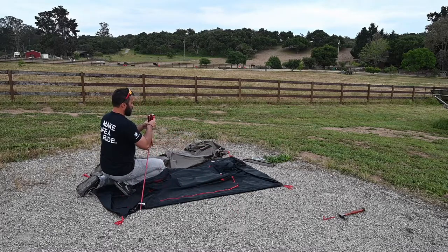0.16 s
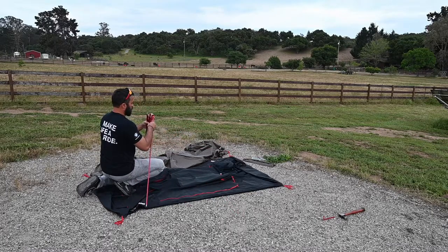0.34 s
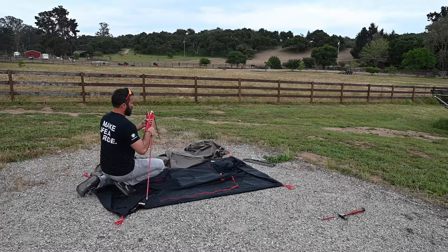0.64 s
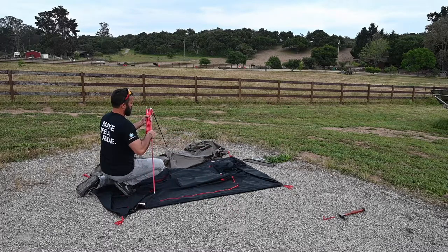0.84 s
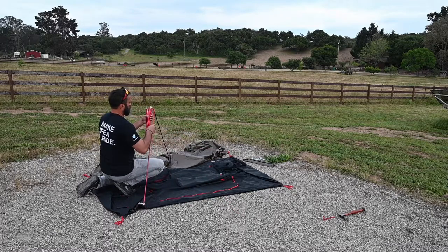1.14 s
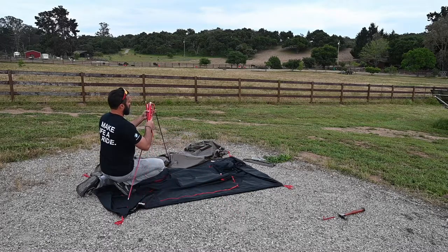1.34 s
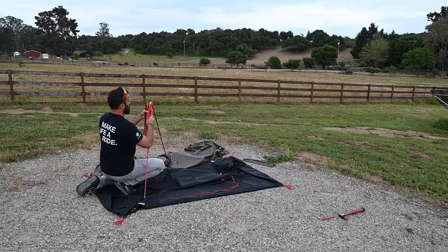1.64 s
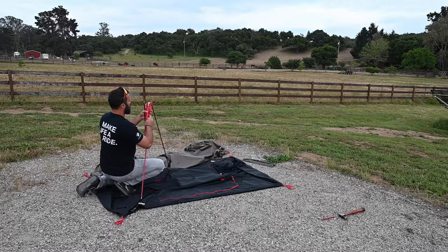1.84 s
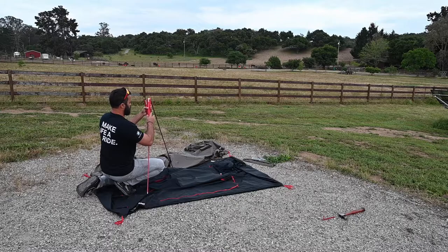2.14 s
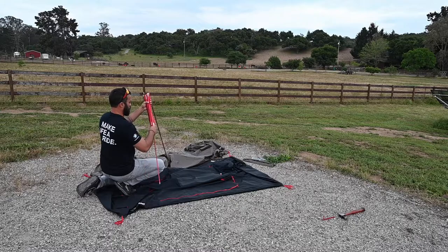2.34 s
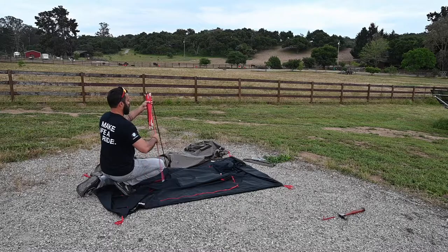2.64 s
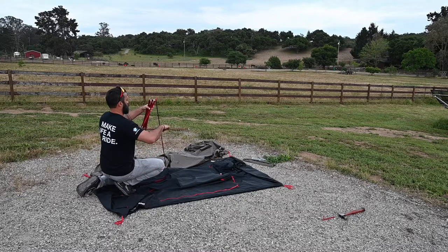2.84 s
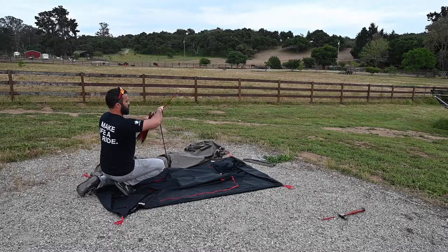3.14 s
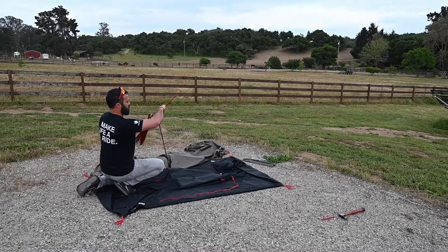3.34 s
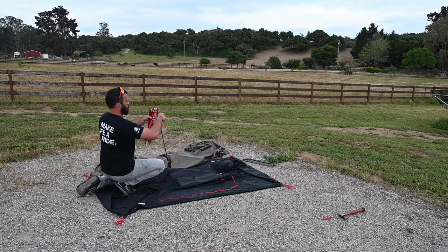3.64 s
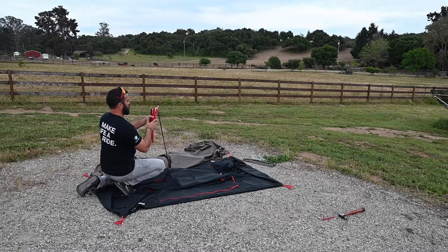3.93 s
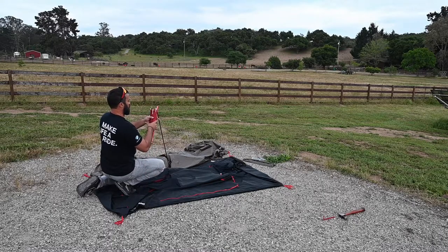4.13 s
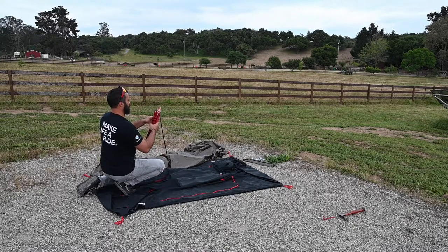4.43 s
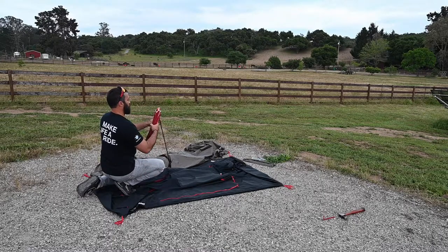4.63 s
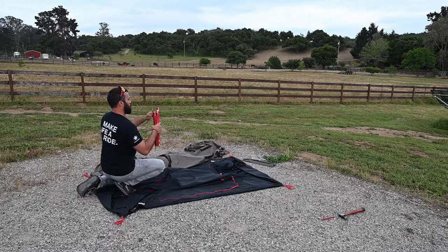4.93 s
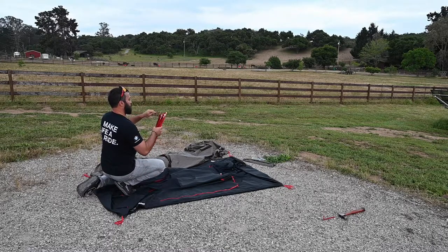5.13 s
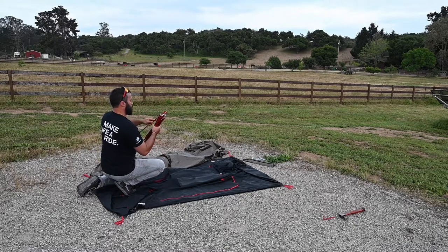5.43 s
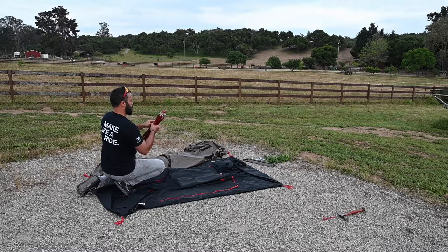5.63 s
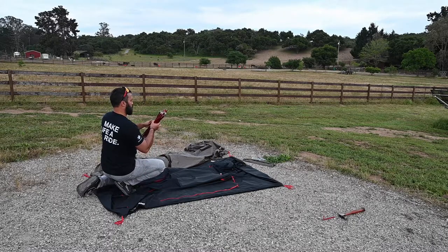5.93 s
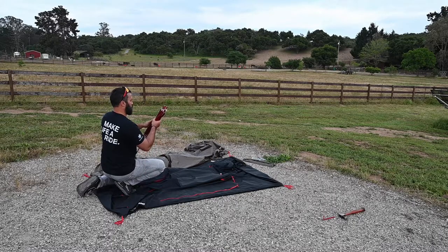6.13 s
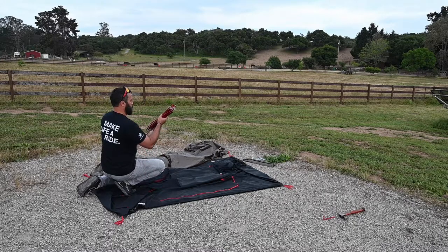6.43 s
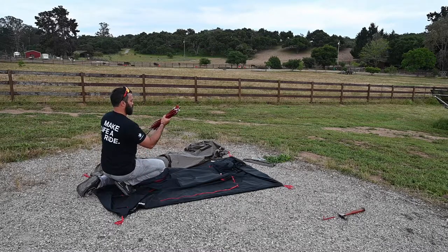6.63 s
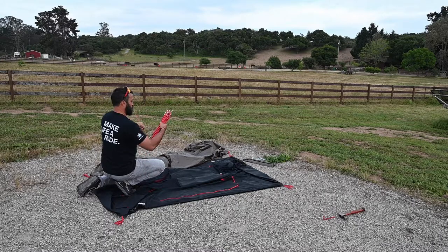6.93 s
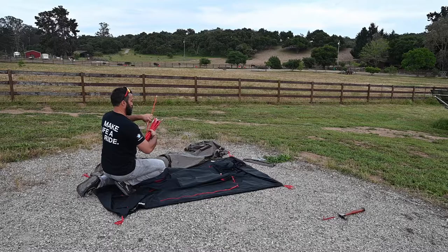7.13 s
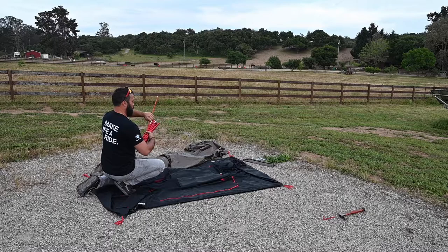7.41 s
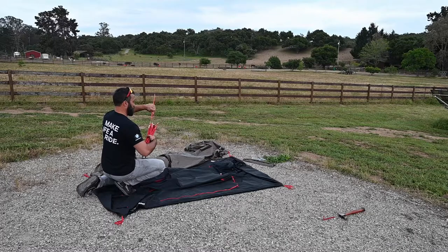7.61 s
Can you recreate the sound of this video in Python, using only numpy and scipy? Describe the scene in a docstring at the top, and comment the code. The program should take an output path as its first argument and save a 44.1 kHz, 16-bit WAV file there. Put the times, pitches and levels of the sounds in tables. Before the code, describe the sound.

Outdoors, hollow metal tent poles are folded into a bundle: irregular dry ticks, light scrapes and a few hard bright clacks over quiet air.

```python
"""An aluminium tent pole on shock cord is folded: sections slide out of their joints and clack on the held bundle.
Each contact is a few sharp ticks, a short noisy rattle damped by the grip, and a thin ring of tube modes.
Hands, sleeves and tubes rub in between, as gated noise with catches and crackles.
Around it lie a low steady hush of noise, a far bird of gliding sine notes and a faint sine drone.
Scattered tails and a smeared fence echo place it outdoors; loud peaks briefly pull the level down."""
import sys
import numpy as np
from scipy import signal
from scipy.fft import rfft, irfft, next_fast_len
from scipy.io import wavfile
from scipy.ndimage import uniform_filter1d, map_coordinates

SR = 44100
rng = np.random.default_rng(int(sys.argv[2]) if len(sys.argv) > 2 else 0)


def unload_wav(signal):
    """Save mono or channel-first audio to the path in sys.argv[1] as 16-bit WAV at rate SR, clipped to [-1, 1]."""
    wavfile.write(
        sys.argv[1],
        SR,
        np.round(np.clip(np.atleast_2d(signal).T, -1, 1) * 32767).astype(np.int16),
    )


N = 342657

# colour of tubes scraping along each other: (frequency [Hz], relative density [dB per Hz])
SCRAPE_COLOUR = [(500, -32.5), (1500, -12.5), (2800, 0), (4400, 0), (5800, -8.5), (8000, -3),
                 (10200, -14.5), (12000, -9.5), (16000, -24)]
# colour of distant wind and traffic: (frequency [Hz], relative density [dB per Hz])
HUSH_COLOUR = [(15, -33), (25, -17), (99, -0.5), (354, -2.5), (531, -1), (1190, -6), (1440, -10.5),
               (2410, -17), (2760, -15.5), (3250, -17), (4370, -15.5), (5430, -19), (7920, -19.5),
               (14800, -22.5), (16000, -24.5)]
FIRM_DB = -42.5  # contact level taken as a firm blow; sheen and settling are reckoned from it


def amp(db):
    """Decibels to an amplitude factor."""
    return 10 ** (np.asarray(db) / 20)


def unit(x):
    """Scale to rms 1."""
    return x / np.sqrt(np.mean(x ** 2) + 1e-20)


def along(points, hz):
    """Interpolate (Hz, value) points on a log frequency axis."""
    f, v = np.transpose(points)
    return np.interp(np.log(hz + 1), np.log(f + 1), v)


def add(track, s, sound):
    """Mix a sound into a track from time s."""
    part = track[max(round(s * SR), 0):][:len(sound)]
    part += sound[:len(part)]


def wobble(rate):
    """A smooth random curve, rate knots a second."""
    knots = rng.standard_normal(int(N * rate / SR) + 4)
    return map_coordinates(knots, [np.arange(N) * rate / SR])


def filtered(x, response):
    """Multiply the spectrum of x by a response of frequency."""
    m = next_fast_len(N + SR // 2)
    return irfft(rfft(x, m) * response(np.fft.rfftfreq(m, 1 / SR)), m)[..., :N]


def noise(spectrum):
    """Coloured noise of rms 1."""
    return unit(filtered(rng.standard_normal(N), lambda hz: amp(along(spectrum, hz))))


def causal(gain_db):
    """The minimum-phase response with these gains: nothing sounds before the blow."""
    cepstrum = irfft(np.log(amp(gain_db)))
    half = len(cepstrum) // 2
    cepstrum[1:half] *= 2
    cepstrum[half + 1:] = 0
    return np.exp(rfft(cepstrum))


def hush(swell_db):
    """Distant wind and traffic: coloured noise, nearly steady."""
    return amp(swell_db * wobble(3)) * noise(HUSH_COLOUR)


def hush_width():
    """A separate noise for the side of the hush, weak in the bass and wider towards the treble."""
    # side weighting of the hush: (frequency [Hz], gain [dB])
    width = [(30, -20), (60, -23.5), (250, -17.5), (1000, -11.5), (4000, -2), (12000, 1.5)]
    return filtered(noise(HUSH_COLOUR), lambda hz: amp(along(width, hz)))


def drone(pitch_hz):
    """A low, slightly unsteady hum from far away: a sine of wandering pitch and level."""
    # level of the hum before its small wobble: (time [s], level [dB])
    hum = [(5.6, -99), (6.0, -73), (6.85, -77), (7.15, -94)]
    level_db = np.interp(np.arange(N) / SR, *np.transpose(hum))
    pitch = pitch_hz + 1.55 * wobble(5)
    tone = unit(np.sin(2 * np.pi * np.cumsum(pitch) / SR))
    return amp(level_db + 1.5 * wobble(6)) * tone


def bird(fall_hz, faint_hz, faint_db):
    """Falling sine whistles in quick runs of two or three, with mostly weaker, lower ones throughout."""
    note_s, step_s = .028, .04  # length of a note, time from note to note
    first_s, gap_s, jitter_s = .19, 0.35, 0.017  # first run, time from run to run, its unevenness
    trill_hz, spread_hz = 4660, 75  # starting pitch of a note
    trill_db, fade_db_per_s = -67.5, .6  # level at time zero, and its steady loss
    weak_notes, weak_spread_db, weak_drop_hz = 190, 6, 450  # count, range of level above and pitch below
    out, u = np.zeros(N), np.linspace(0, 1, int(note_s * SR))

    def whistle(start_hz):
        """One note gliding down ever faster."""
        pitch = start_hz - fall_hz * u * (1 + u) / 2
        return unit(np.sin(np.pi * u) * np.sin(2 * np.pi * np.cumsum(pitch) / SR))

    for beat in np.arange(first_s, N / SR, gap_s):
        s = beat + rng.normal(0, jitter_s)
        db = trill_db - fade_db_per_s * beat
        for k in range(2 + rng.integers(2)):
            note = whistle(rng.normal(trill_hz, spread_hz))
            add(out, s + k * step_s, amp(db + rng.normal(0, 2)) * note)
    for k, (late, drop, strength) in enumerate(rng.random((weak_notes, 3))):
        s = (k + late) / weak_notes * N / SR
        note = whistle(faint_hz - weak_drop_hz * drop)
        add(out, s, amp(faint_db + weak_spread_db * strength) * note)
    return out


def fidget(db, spread_db):
    """The held bundle never lies quite still: very faint scrape noise comes and goes in flurries."""
    return amp(db) * unit(amp(spread_db * wobble(130) + 7.1 * wobble(13))) * noise(SCRAPE_COLOUR)


def rubbing(grit_db, edge_s, crackle_db):
    """Tubes scrape in tiny catches and crackles while hands and sleeves brush as darker noise."""
    # strokes: (start [s], end [s], scrape level [dB], cloth level [dB])
    rubs = [(0.079, .13, -54.5, -66.5), (0.695, .745, -54, -80), (0.926, 1.094, -58, -59.5),
            (1.134, 1.2, -61, -52.5), (1.58, 1.654, -57, -63), (1.717, 1.787, -58.5, -57),
            (1.834, 1.908, -56, -60), (1.926, 2.02, -61, -68), (3.022, 3.077, -62.5, -61.5),
            (3.17, 3.32, -64, -65), (3.358, 3.418, -58, -72), (3.936, 4.126, -62, -75),
            (4.126, 4.232, -48.5, -68.5), (4.68, 4.803, -61, -60.5), (4.951, 5.02, -60, -73),
            (5.877, 5.967, -58.5, -62.5), (6.423, 6.477, -53, -59), (7.487, 7.588, -55.5, -65)]
    # colour of hands and sleeves: (frequency [Hz], relative density [dB per Hz])
    cloth_colour = [(200, -18), (600, 0), (1100, 2.5), (1900, -2), (3500, -29.5), (8000, -20.5)]
    t = np.arange(N) / SR
    scrape, cloth = np.zeros((2, N))
    for start, end, scrape_db, cloth_db in rubs:
        # the ramps reach slightly outside the stroke
        stroke = np.clip(np.minimum(t - start, end - t) / edge_s + 0.27, 0, 1)
        scrape += amp(scrape_db) * stroke
        cloth += amp(cloth_db) * stroke
    catches = unit(amp(grit_db * wobble(350)))
    slips = (rng.random(N) < 90 / SR) * rng.uniform(0.46, 1, N)  # about 90 a second
    crackle = unit(signal.fftconvolve(slips, amp(-60 * t[:SR // 20] / 0.015))[:N])
    grain = unit(catches + amp(crackle_db) * crackle)
    brush = unit(amp(7.3 * wobble(70)) + crackle)
    return scrape * grain * noise(SCRAPE_COLOUR) + cloth * brush * noise(cloth_colour)


def contacts():
    """Every touch of the tubes as (s, dB, chatter s, knock dB, body dB): settling clacks, judders, stray ticks."""
    # clacks and knocks of tube on tube:
    # (time [s], relative level [dB], nominal chatter [s], low knock gain [dB], body gain [dB])
    clacks = [(0.1366, -36.5, 0.00057, 4, -1), (0.7066, -46, 0.0039, 4, 14), (1.068, -50.5, 0.0078, 34, 0),
              (1.0922, -48.5, .0028, 20.5, 13), (1.1012, -44.5, 0.00067, 3, -1),
              (1.138, -58, 0.0053, 39, 2), (1.3507, -45.5, 0.00048, -1, -4.5),
              (1.4885, -53.5, 0.0056, 4, 6.5), (1.5795, -35.5, 0.00055, -3, -13),
              (1.5845, -41, .0029, 19.5, 17.5), (1.6793, -52, 0.0018, 8, 4.5), (1.726, -55, 0.0072, 40, 2),
              (1.935, -53, 0.0015, 13, 5), (1.9936, -51, .0016, 3, 6.5), (2.012, -55.5, 0.0017, 20, 13),
              (2.1218, -41.5, 0.00055, 1, 3), (2.134, -46, 0.00051, -2, -8), (2.418, -55, .0012, 8, 3.5),
              (2.5356, -48, 0.002, -18, -4), (2.7999, -33.5, .0012, 3, 0), (2.8843, -45, 0.0058, 0, 2),
              (3.102, -53, 0.0016, 6, 3), (3.25, -44, .002, 11.5, 9), (3.2803, -27, 0.0023, -2, -2),
              (3.414, -54, 0.0026, -7, -11), (3.5565, -17.5, 0.0029, 2.5, -1), (3.589, -39.5, 0.0033, 0, 3),
              (3.63, -44.5, .005, 9, 2), (3.855, -49, 0.0023, 5, 4), (3.876, -53, .0017, 3, 1),
              (3.97, -51, 0.0022, 9, 5), (3.9835, -40.5, 0.002, 7, 2), (4.004, -32.5, 0.0026, 2, -0.5),
              (4.064, -51, .0025, -8, 3), (4.2735, -34, 0.0017, 6, 0), (4.3674, -46.5, 0.0015, 7, 7.5),
              (4.4053, -52.5, .0012, 10, 15), (4.54, -59, .0016, 9, 6), (4.7685, -55.5, 0.0068, 39, 22),
              (4.845, -50.5, .0043, 20.5, -3), (5.2445, -37, 0.0052, 2, 4), (5.262, -47.5, 0.0042, 7, 2),
              (5.427, -54, 0.0023, 18, 13), (5.4916, -51, .0008, 1, 7), (5.5198, -36, .0005, -7, -3.5),
              (5.5268, -39, 0.00088, 2, 0), (5.565, -46.5, .0023, 4, 4), (5.777, -46.5, .0021, -13, 6),
              (5.794, -47.5, 0.00057, 5, 3), (5.889, -46, 0.00044, -16, 2), (5.8967, -43.5, .0014, 11, 1),
              (5.903, -34.5, 0.00037, -13, 2), (5.9336, -42, 0.0016, -18, 11),
              (6.0775, -44, 0.00061, -7, 2), (6.315, -58, .0012, -8, 2.5), (6.466, -49.5, .0022, -12, 11),
              (6.537, -55.5, 0.0038, 1, 9), (6.694, -53.5, 0.00048, -12, 8), (6.836, -36.5, 0.0028, -5, 4),
              (6.8409, -30.5, .0019, 4, 2), (6.872, -43.5, 0.0051, 5, 5.5),
              (7.1856, -48.5, 0.0034, -0.5, 1), (7.2129, -36.5, .001, -1, 1), (7.5635, -36, 0.0015, -2, -4),
              (7.6721, -16, 0.00037, 2.5, 1), (7.687, -22.5, .003, 1, -1.5)]
    # a section judders along its neighbours:
    # (start [s], end [s], relative level at start [dB], at end [dB], low knock gain [dB], body gain [dB])
    judders = [(4.139, 4.209, -37.5, -41.5, 2, 2), (6.4263, 6.453, -36, -40.5, -24, 0),
               (7.525, 7.545, -34, -39, -1.5, 3)]
    # after a blow the tube settles: mean gap, first touch below a firm blow, loss a touch
    settle_s, settle_db, settle_loss_db = .0095, -12.5, 10
    # the grip holds the rebounds of hard blows in check: dB of settling per dB of blow
    settle_grows, settle_chatter_s = 0.65, 0.0028
    catch_s, catch_chatter_s, catch_spread_db = 0.011, .0038, 1  # approximate gap, chatter, unevenness
    ticks_per_s, tick_db, tick_spread_db = 4, -63, 3  # loose sections touch lightly in the hand
    tick_chatter_s, tick_knock_db, tick_body_db = .002, 8.5, 7.5
    touches = []
    chances = rng.uniform(-1, 1, (len(clacks), 2, 2))
    for (s, db, length, *colour), chance in zip(clacks, chances):
        touches.append((s, db, length, *colour))
        first_db = FIRM_DB + settle_grows * (db - FIRM_DB) + settle_db
        for k, (late, force) in enumerate(chance):
            when = s + settle_s * (k + 1 + late / 3)
            level_db = first_db - settle_loss_db * k + 2 * force
            touches.append((when, level_db, settle_chatter_s, *colour))
    for start, end, first_db, last_db, *colour in judders:
        for u in np.linspace(0, 1, round((end - start) / catch_s) + 1):
            s = start + u * (end - start) + rng.normal(0, catch_s / 10)
            db = first_db + u * (last_db - first_db) + rng.normal(0, catch_spread_db)
            touches.append((s, db, catch_chatter_s, *colour))
    for slot in np.arange(0, N / SR, 1 / ticks_per_s):
        s = slot + rng.random() / ticks_per_s
        db = rng.normal(tick_db, tick_spread_db)
        touches.append((s, db, tick_chatter_s, tick_knock_db, tick_body_db))
    return touches


def chatter(t, length, count):
    """Force of one contact: a first graze, then rebounds scattered over roughly its length."""
    force = np.zeros(len(t))
    when = (np.arange(count) + rng.uniform(-.5, .5, count)) / count * 1.35 * abs(length)
    when[0] = 0
    strength = amp(rng.normal(0, 1, count)) * rng.choice([-1, 1], count)
    strength[0] *= .5
    np.add.at(force, np.round(when * SR).astype(int), strength)
    return force


def tube_ring(t, detune, scatter_db):
    """Decaying bending modes; pitches and strengths vary with the section and where it is struck."""
    # bending modes of the tubes: (nominal frequency [Hz], relative level [dB], t60 [s])
    tube = [(860, 10, 0.024), (1460, -36, 0.044), (2030, -27, 0.043), (2600, -25.5, .06), (3240, 9, 0.13),
            (4210, -2, 0.16), (4360, 16, .06), (5080, 15, 0.084), (7200, -1.5, 0.17), (7800, -8, .08),
            (8300, -19, 0.11), (9100, -1.5, 0.088), (10900, -14, 0.1), (12200, -20, 0.11),
            (14300, -22, 0.11)]
    hz, db, t60 = np.transpose(tube)[:, :, None]
    pitch, strength, phase = rng.standard_normal((3, len(tube), 1))
    decay = amp(db + scatter_db * strength - 60 * t / t60)
    modes = decay * np.sin(2 * np.pi * (hz * (1 + detune * pitch) * t + phase))
    return unit(modes.sum(0))


def poles(clack_t60, bundle_db, ring_db, ripple_db, size=8192):
    """Every contact is a few sharp ticks, the dense short rattle of the gripped bundle, and a thin metal ring."""
    # colour of ticks and rattle: (frequency [Hz], gain [dB])
    clack_colour = [(40, -28.5), (350, -30), (800, -17.5), (1900, -8.5), (3000, -4.5), (4400, 0.5),
                    (5800, -3.5), (7200, 3), (8600, 2.5), (10200, -10), (11600, -8), (13500, -14),
                    (16000, -25)]
    sheen_base_db, sheen_per_db = 2, 0.2543  # treble of a firm blow; harder ones are brighter
    out, t, hz = np.zeros(N), np.arange(size) / SR, np.fft.rfftfreq(size, 1 / SR)
    colour = causal(along(clack_colour, hz))
    for s, db, length, knock_db, body_db in contacts():
        force = chatter(t, length, count=5)
        # each rebound feeds energy into the bundle, and the hand soaks it up
        energy = np.abs(signal.fftconvolve(force ** 2, amp(-60 * t / clack_t60) ** 2)[:size])
        bundle = unit(rng.standard_normal(size) * np.sqrt(energy))
        clack = unit(irfft(rfft(unit(force) + amp(bundle_db) * bundle) * colour))
        ring = unit(signal.fftconvolve(force, tube_ring(t, detune=0.0097, scatter_db=2.0))[:size])
        # the place and hardness of the blow tilt its colour
        sheen_db = sheen_base_db + sheen_per_db * (db - FIRM_DB)
        tilt_points = [(1600, knock_db), (2800, body_db), (4800, body_db),
                       (6600, 0), (9000, 0.0054), (11500, sheen_db)]
        tilt = along(tilt_points, hz)
        # and favour some of the bundle's broad resonances over others
        ripple = map_coordinates(rng.standard_normal(64), [hz / 400], mode="nearest")
        touch = causal(tilt + ripple_db * ripple)
        struck = unit(irfft(rfft(clack + amp(ring_db) * ring) * touch))
        add(out, s, amp(db - 12) * struck)
    return out


def outdoors(x, scatter_db, fence_db, size=8192):
    """A weak diffuse tail, redrawn for each short block of sound, and one smeared echo from the fence."""
    # scatter from ground and fence: (frequency [Hz], t60 [s])
    air = [(200, .15), (2000, 0.27), (8000, 0.28), (16000, 0.25)]
    # colour of the fence echo: (frequency [Hz], relative gain [dB])
    fence = [(500, -23), (2500, -21.5), (5200, -6.5), (6500, -9), (8300, -2), (9600, -4.5), (16000, -30)]
    out = x.copy()
    for start in range(0, N, size):
        hz, t, z = signal.stft(rng.standard_normal(SR // 4), SR, nperseg=256)
        decay = amp(-60 * t / along(air, hz)[:, None])
        tail = signal.istft(z * decay, SR, nperseg=256)[1]
        tail = amp(scatter_db) * tail / np.linalg.norm(tail)
        add(out, start / SR + .003, signal.fftconvolve(x[start:start + size], tail))
    rails = rng.standard_normal(SR // 250)  # 4 ms of smear
    smeared = signal.fftconvolve(x, rails / np.linalg.norm(rails))[:N]
    echo = filtered(smeared, lambda hz: amp(along(fence, hz)))
    add(out, .06, amp(fence_db) * echo)  # 60 ms late
    return out


def gain_control(x, threshold_db, release_db_per_s, attack_s):
    """A very loud clack pulls the gain down, and the background takes a moment to return."""
    recovery = release_db_per_s * np.arange(N) / SR
    power = np.abs(uniform_filter1d(x[0] ** 2, SR // 1000))  # left channel over 1 ms
    excess_db = np.maximum(10 * np.log10(power + 1e-12) - threshold_db, 0)
    # hold the largest cut so far, let go at the release rate
    cut_db = np.maximum.accumulate(excess_db + recovery) - recovery
    pole = np.exp(-1 / (attack_s * SR))
    return x * amp(-signal.lfilter([1 - pole], [1, -pole], cut_db))


def scene():
    """Everything sits in the middle; only a trace of the hush differs between the ears."""
    country = amp(-62.0) * hush(swell_db=.35)
    side = amp(-65.5) * hush_width()
    far = outdoors(bird(fall_hz=600, faint_hz=4720, faint_db=-78.5), scatter_db=-9, fence_db=-30)
    handling = fidget(db=-74.5, spread_db=10) + rubbing(grit_db=2.5, edge_s=0.024, crackle_db=-4.5)
    clacks = poles(clack_t60=.022, bundle_db=7.5, ring_db=-20, ripple_db=2.2)
    near = outdoors(clacks + handling, scatter_db=-17.0, fence_db=-19)
    mid = near + far + drone(pitch_hz=201) + country
    return np.array([mid + side, mid - side])


def record(dry):
    """The level ducks after loud peaks, and a steep low-pass removes the top of the treble."""
    held = gain_control(dry, threshold_db=-20, release_db_per_s=45, attack_s=.003)
    top_hz = 16100
    return filtered(held, lambda hz: 1 / np.sqrt(1 + (hz / top_hz) ** 160))


dry = scene()
out = record(dry)
unload_wav(out)
```